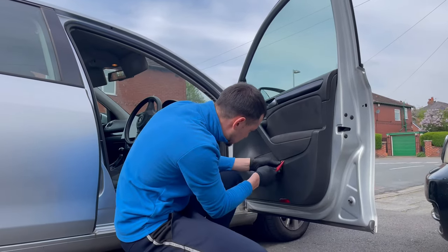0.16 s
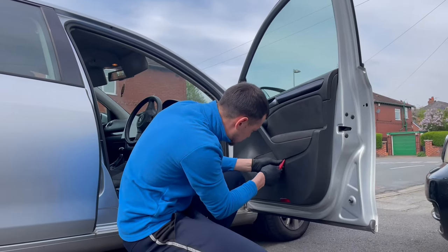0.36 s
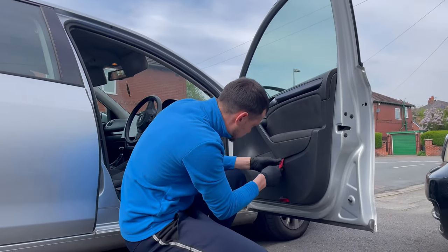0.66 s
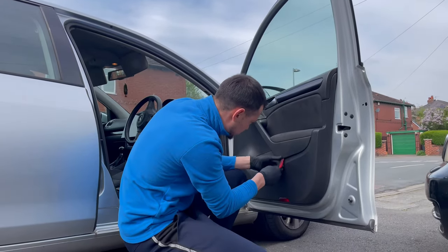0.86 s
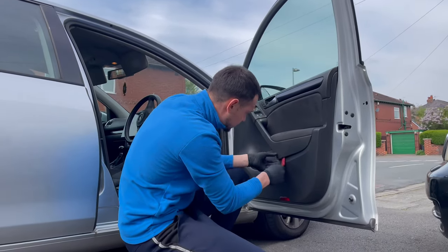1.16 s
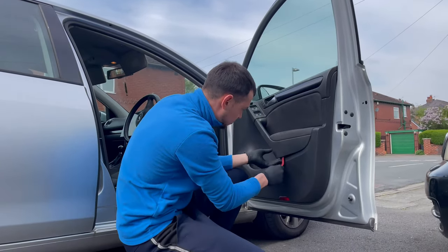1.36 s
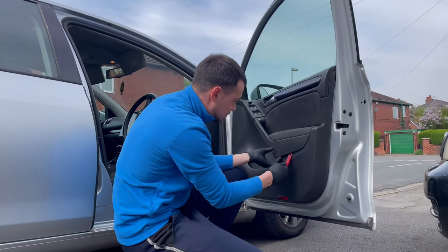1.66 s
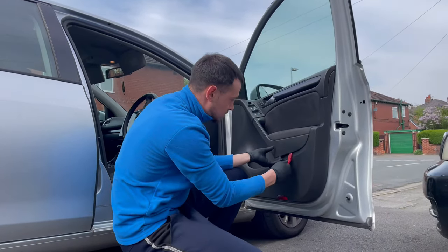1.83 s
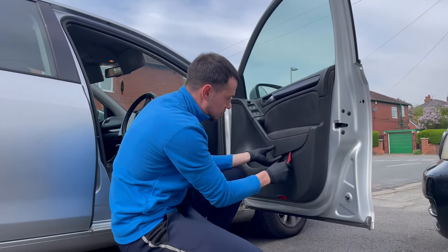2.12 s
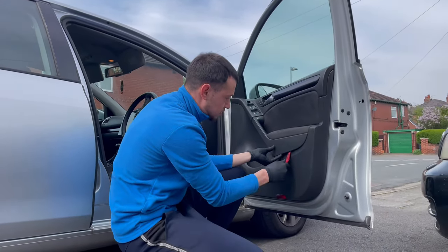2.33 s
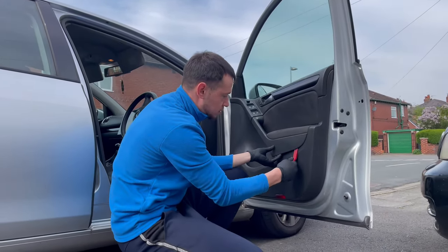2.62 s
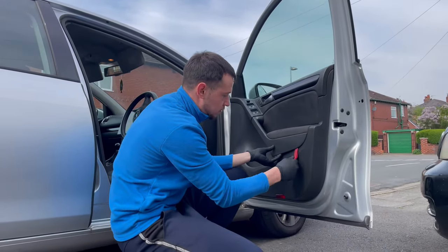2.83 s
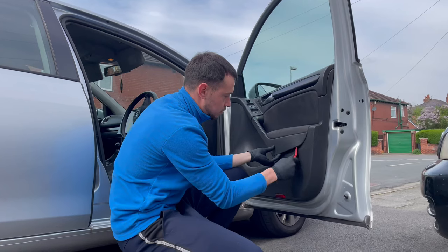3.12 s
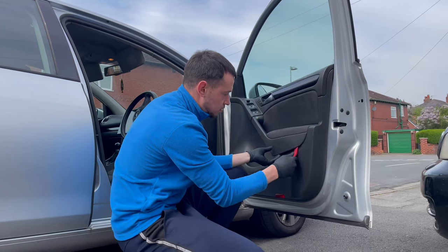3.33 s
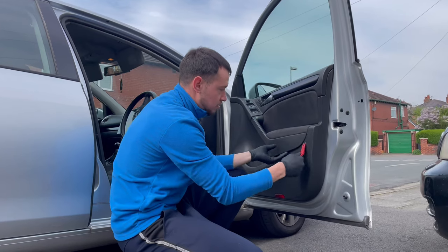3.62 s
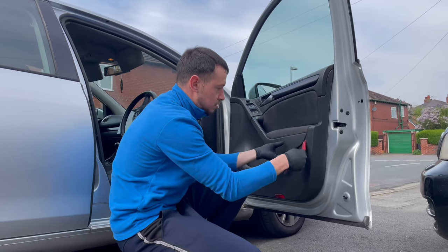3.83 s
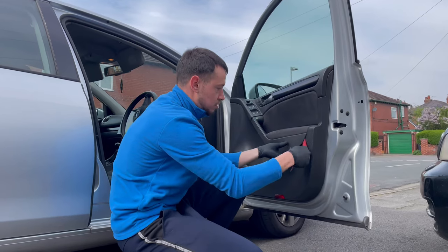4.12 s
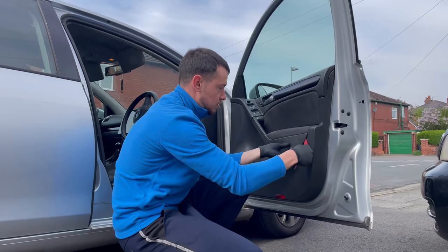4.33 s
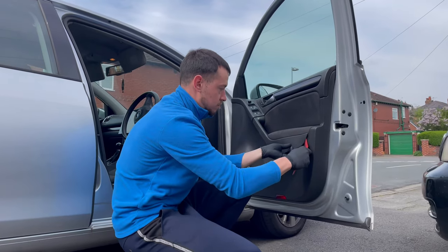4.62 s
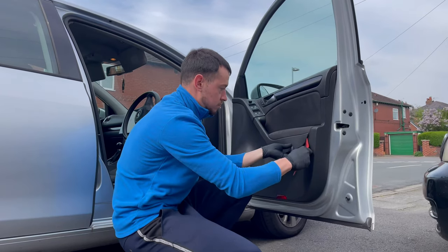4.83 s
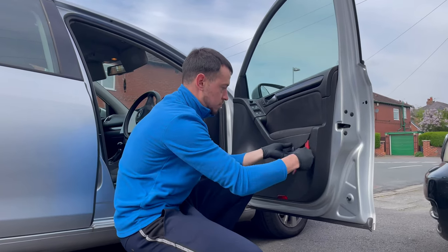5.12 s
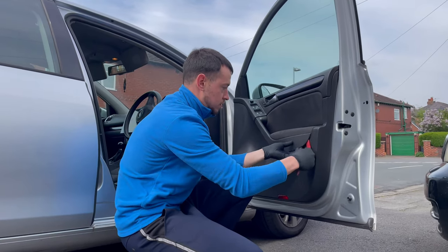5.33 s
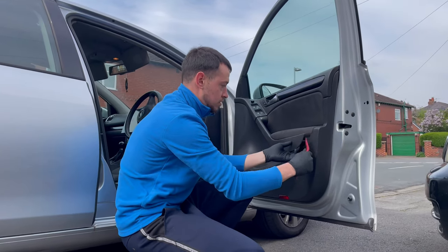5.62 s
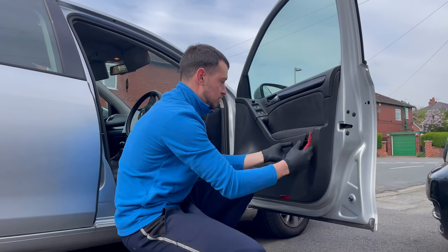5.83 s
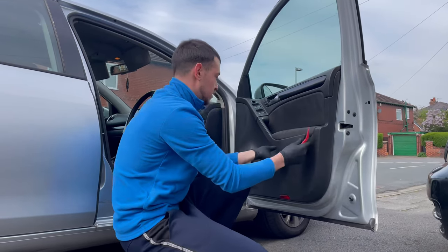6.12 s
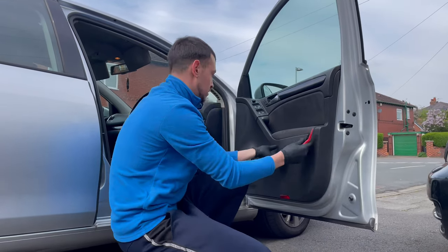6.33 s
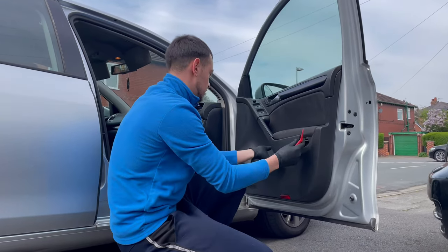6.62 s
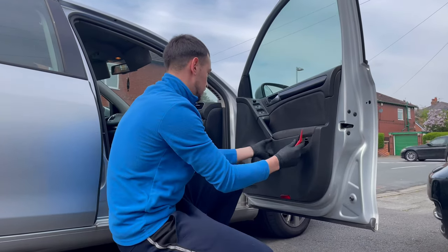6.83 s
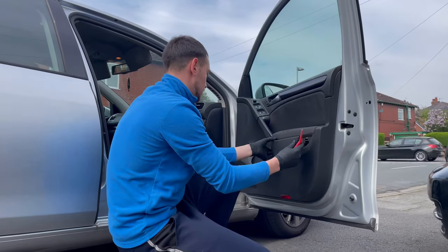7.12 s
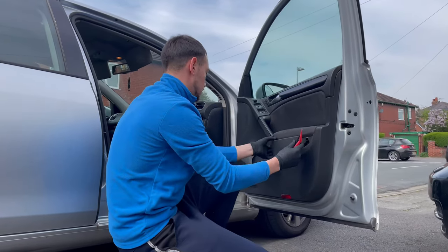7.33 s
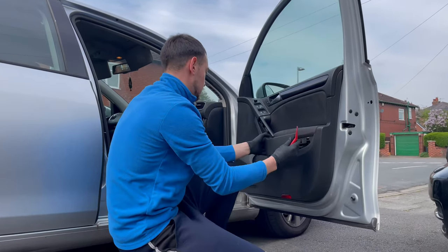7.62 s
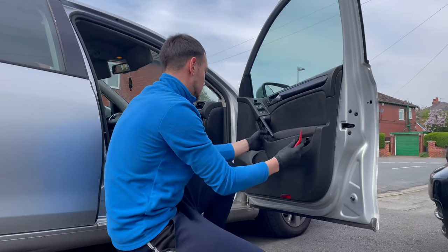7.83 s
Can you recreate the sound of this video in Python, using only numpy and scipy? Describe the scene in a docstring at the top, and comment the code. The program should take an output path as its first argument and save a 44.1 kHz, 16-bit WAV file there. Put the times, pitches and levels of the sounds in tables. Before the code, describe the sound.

Outdoors, over a soft hiss of faraway traffic, plastic trim on a car door clicks and cracks as a tool levers at it a couple of metres away. A few separate snaps with a hollow knock come first, wind puffs on the microphone around the middle, and then the snaps come more often, ending with a loud one. Gloves and sleeves rustle faintly, and the tool scrapes lightly.

```python
"""An open car door in a breezy street, two metres from a phone; traffic hisses far off throughout.
Wind puffs on the microphone ports as a plastic lever starts to pry and scrape at the trim, gloves and
sleeves rustling. Clips snap and ring the hollow panel, hard at 1.2 and 3.1 s. A gust peaks near 3.8 s;
from 5 s the snaps crowd in, the last big one at 7.5 s. A low cut slides up and down under it all."""
import sys
import numpy as np
from scipy import signal
from scipy.fft import rfft, irfft
from scipy.io import wavfile
from scipy.ndimage import uniform_filter1d

SR = 44100
rng = np.random.default_rng(int(sys.argv[2]) if len(sys.argv) > 2 else 0)


def materialize(psi):
    """Save the field psi as 16-bit PCM at rate SR to the path in sys.argv[1].

    A 1-D psi becomes a single channel; in a 2-D psi each row is a channel.
    """
    bounded = np.clip(np.atleast_2d(psi).T, -1, 1)
    quanta = np.round(bounded * 32767).astype(np.int16)
    wavfile.write(sys.argv[1], SR, quanta)


N = 351036
HZ = np.fft.rfftfreq(N, 1 / SR)

# Trim and lever snapping, two metres off. Each row: start in seconds; dry peaks of knock, thump, clack,
# crack and tick in dB; knock and thump pitch in Hz; slip time in ms; crack tilt in dB/octave; bite in dB.
CLIP_SNAPS = [(.225, -40, -42, -60, -54, -51, 900, 350, 4.6, 4, -3),
              (.319, -32, -62, -34, -31.5, -32, 1170, 519, 2.7, 4, 6),
              (.33, -23.5, -67, -32.5, -29.5, -33, 870, 474, 1.7, 2, -11),
              (.361, -24, -49, -29.5, -32, -35, 900, 371, 2.24, 14, 4),
              (.718, -53, -84, -47, -48.5, -78, 1110, 500, 4.3, -20, -4),
              (.998, -47, -40, -49, -44, -69, 723, 463, 5.8, -14, -10),
              (1.1785, -14.5, -19.5, -16, -5.5, -2, 1110, 445, 2.16, 8, 5),
              (1.259, -47, -41.5, -44, -38, -72, 1080, 474, 4.8, -21, -11),
              (1.46, -43, -64, -43, -48, -58, 830, 501, 3.5, -5, 3),
              (1.499, -38, -76, -42.5, -42, -74, 665, 470, 4.6, -27, 0),
              (1.866, -19.5, -32, -34.5, -29, -33, 646, 476, 2.6, -1.5, -5.5),
              (2.075, -47, -53.5, -46, -49, -80, 1154, 380, 4.7, -19, -9),
              (2.667, -41.5, -34, -46.5, -52, -76, 608, 330, 4, 4.5, 0),
              (2.868, -57.5, -55.5, -62.5, -72, -64, 923, 350, 9.5, 0, 0),
              (3.069, -11.5, -12.5, -10.5, -6, -9, 633, 287, 2.3, -4.5, 6),
              (3.305, -44, -49, -42.5, -44.5, -85, 894, 215, 5.1, -40, -9),
              (3.332, -42, -42.5, -46.5, -44.5, -48, 728, 202, 2.8, 1, -6),
              (4.515, -54, -75, -59, -45.5, -80, 913, 466, 4.1, -14, -8),
              (4.704, -39, -35.5, -42, -52, -59, 642, 347, 3.9, -4.5, -5),
              (4.975, -36, -38.5, -33.5, -43.5, -52, 800, 339, 3.4, 7, -2),
              (4.982, -10, -12, -16.5, -14.5, -14.5, 784, 380, 1.84, -2, -2),
              (5.419, -31.5, -51, -35, -47, -60, 1050, 476, 1.6, 8, 0),
              (5.423, -29.5, -36.5, -38, -21.5, -28, 1100, 480, 2.63, -6, -3.5),
              (5.4725, -14.5, -29, -10, -10, -17.5, 960, 342, 2.138, 11, 14.5),
              (5.711, -21, -51, -22.5, -18.5, -30, 930, 476, 2.7, -8.5, -3.5),
              (6.184, -34.5, -68, -42, -36.5, -39.5, 600, 255, 2.6, 8, -7),
              (6.219, -38, -68, -43, -40, -48, 738, 258, 2.9, 12, -4),
              (6.246, -42, -50, -42, -39, -45, 610, 210, 3.3, 8, -10),
              (6.285, -46, -62, -43, -41, -52, 958, 269, 2.6, 2, 0),
              (6.307, -35, -55, -30.5, -24.5, -19, 1100, 275, 1.7, 11, -13.5),
              (6.411, -31, -31.5, -33, -38, -46, 780, 480, 1.93, 7, 2),
              (6.423, -14, -22, -21, -13, -16.5, 700, 350, 2.18, -7, -4.5),
              (6.453, -21.5, -25.5, -34, -40, -38, 840, 358, 1.08, 4, -2),
              (6.478, -18.5, -22.5, -27, -22.5, -26, 645, 307, 2.05, 1, -13),
              (6.845, -23.5, -40.5, -20.5, -23, -25, 900, 345, 2.6, -7, -23),
              (7.004, -45, -70.5, -54.5, -50.5, -51, 1068, 398, 3, 12, 1),
              (7.105, -58.5, -70, -59, -52, -53.5, 1000, 400, 4.1, 2, -5),
              (7.352, -28.5, -37.5, -34.5, -35, -41, 715, 493, 2.9, -7, -15),
              (7.39, -25.5, -38.5, -25, -27, -36.5, 800, 480, 2, -5, -12),
              (7.461, -34, -34, -43, -39, -57, 616, 202, 9, 7, -3),
              (7.4965, -21.5, -25, -25, -16, -17, 1090, 299.8, 1.5, 4, -31),
              (7.499, -8.5, -14.5, -9.5, -9, -11.5, 1010, 290, 1.43, 9, 0),
              (7.557, -26.5, -28, -36.5, -36.5, -60, 940, 283, 2.9, -14, -2),
              (7.815, -48, -36.5, -51.5, -49, -54, 638, 296, 4.1, 7, -20)]
# The tick on top of a snap. Each row: frequency in Hz, level in dB.
TICK_SPECTRUM = [(4410, -29), (7800, -19), (8670, -9), (9610, -10), (13900, -17.5), (15500, -27),
                 (16500, -47.5)]
# Size of the main slip against the tiny ones, as a ratio for knock, thump, clack, crack and tick.
MAIN_SLIPS = [24, 9, 24, 22, 8]

def trim_snaps():
    """A clip lets go in one main slip amid a burst of tiny ones, which ring the panel."""
    time_ms = np.arange(2400) * 1000 / SR
    hz = np.linspace(0, SR / 2, 65)
    tick_gain = gain_of(spectrum_at(TICK_SPECTRUM, hz)) * (hz > 7000) * (hz < 20000)
    tick = signal.firwin2(65, hz, tick_gain, fs=SR)[None]
    rises, decays = [.9, .91, .824, .76, .39], [.95, 2.6, 1.244, 1.4, .98]  # per part, in slip times
    rebound_s, rebounds_db = .0093, [-14, -15.5, -13, -7.5, -21.5]  # the trim rebounds once, a little weaker
    draws = rng.standard_normal((len(CLIP_SNAPS), 2, 2, len(time_ms)))
    spots = rng.standard_normal((len(CLIP_SNAPS), 2, len(PANEL_MODES), 2, 1))
    groups = np.zeros((3, 2, N))  # snaps take turns among three sets of reflections
    for k, (start, *peaks_db, knock_hz, thump_hz, slip_ms, tilt_db, bite_db) in enumerate(CLIP_SNAPS):
        fine, clumps = draws[k]
        slips = fine * gain_of(4.5 * unit_rms(uniform_filter1d(clumps, size=24)))
        knock = panel_ring(spots[k], band=1, pitch_hz=knock_hz, falloff_db=6)
        thump = panel_ring(spots[k], band=0, pitch_hz=thump_hz, falloff_db=3.5)
        clack = panel_ring(spots[k], band=2, pitch_hz=1900, falloff_db=5)
        crack = panel_ring(spots[k], band=3, pitch_hz=2500, falloff_db=-7.5,
                           tilt_db=tilt_db, bite_db=bite_db)
        parts = zip([knock, thump, clack, crack, tick], peaks_db, rises, decays, MAIN_SLIPS, rebounds_db)
        for ring, db, rise, decay, main_size, rebound_db in parts:
            force = (1 - np.exp(-time_ms / (slip_ms * rise))) ** 2 * np.exp(-time_ms / (slip_ms * decay))
            main_slip = main_size * (force == force.max())
            sound = signal.fftconvolve((slips + main_slip) * force, ring, axes=1)
            sound *= gain_of(db) / abs(sound).max(axis=1, keepdims=True)
            add(groups[k % 3], start - .0012, sound)
            add(groups[k % 3], start + rebound_s, gain_of(rebound_db) * sound[::-1])  # sides swapped
    return sum(group + gain_of(-8) * cabin_reflections(group) for group in groups)

# The hollow door panel's modes. Each row: frequency in Hz, level in dB, seconds to die by 60 dB.
PANEL_MODES = [(205, -5, .05), (258, 0, .07), (292, 0, .07), (345, 1, .065), (476, -4, .045),
               (600, -3, .02), (760, -3, .018), (945, -2, .02), (1190, -3, .016), (1450, -1, .011),
               (1720, -2, .013), (1900, 0, .013), (2410, 2, .006), (2750, -2, .004), (3300, -1, .0035),
               (3700, 0, .005), (4200, -2, .004), (4900, -8, .003), (5600, -12, .0025), (6500, -11, .003)]
# Edges in Hz of the thump, knock, clack and crack bands.
BAND_EDGES = [0, 550, 1320, 2580, 7500]

def panel_ring(spot, band, pitch_hz, falloff_db, tilt_db=0, bite_db=0):
    """One band of modes, losing falloff_db per octave from the pitch; the struck spot varies each one."""
    shift, strength = spot
    t = np.arange(1200 if band else 4000) / SR
    out = 0
    for k, (hz, db, t60) in enumerate(PANEL_MODES):
        if BAND_EDGES[band] < hz < BAND_EDGES[band + 1]:
            octaves = np.log2(hz / pitch_hz)
            phase = 2 * np.pi * hz * (1 + shift[k] / 60) * t
            twin_mode = gain_of(-4.5) * np.sign(strength[k, 1]) * np.sin(phase * 1.049)
            db += 3 * strength[k, 0] - falloff_db * abs(octaves) + tilt_db * octaves
            db += bite_db * np.exp(-(np.log2(hz / 3800) / .25) ** 2)
            out = out + (-1) ** k * gain_of(db - 60 * t / t60) * (np.sin(phase) + twin_mode)
    return out

# The open cabin and the street around it. Each row: frequency in Hz, seconds to die by 60 dB.
CABIN_DECAY = [(250, 0.19), (1000, 0.098), (4000, 0.1), (7000, 0.11), (12000, 0.059)]

def cabin_reflections(sound):
    """Dense reflections reach the phone from 4 ms on, each band dying at its own speed."""
    hz, t, bands = signal.stft(rng.standard_normal((2, SR // 4)), SR, nperseg=256)
    decay = gain_of(-60 * t / spectrum_at(CABIN_DECAY, hz)[:, None])
    tail = signal.istft(bands * decay, SR, nperseg=256)[1]
    tail *= np.arange(tail.shape[1]) > .004 * SR
    return signal.oaconvolve(sound, tail / np.linalg.norm(tail[0]), axes=1)[:, :N]

# The lever on the door trim. Each row: start and end in seconds, level in dB, resonance in Hz.
LEVER_DRAGS = [(0.375, 0.482, -66, 4400), (1.451, 1.533, -59, 3450), (2.334, 2.369, -61.5, 2900),
               (2.37, 2.408, -50, 3570), (5.41, 5.436, -47.5, 3950), (6.521, 6.832, -71, 4670),
               (6.899, 7.351, -71.5, 4600)]

def lever_scrapes():
    """The lever tip drags over grained plastic: rough hiss around one broad resonance."""
    out = np.zeros((2, N))
    for start, end, db, hz in LEVER_DRAGS:
        fine, lumps = rng.standard_normal((2, 2, round((end - start) * SR)))
        friction = fine * gain_of(2.3 * unit_rms(uniform_filter1d(lumps, size=90)))
        drag = signal.lfilter(*signal.iirpeak(hz, Q=2.5, fs=SR), friction)
        arch = np.sin(np.linspace(0, np.pi, drag.shape[1])) ** .41
        add(out, start, gain_of(db) * unit_rms(drag) * arch)
    return out

# Swells of high hiss at the door: sleeve rustle and the hissy tails of snaps.
# Each row: loudest moment in seconds, level in dB, length in seconds.
HISS_SWELLS = [(0.576, -74.5, 0.16), (1.053, -69.5, 0.11), (1.228, -57, 0.15), (1.599, -64, 0.24),
               (1.852, -67, 0.11), (2.405, -59, 0.063), (2.492, -66, 0.078), (2.667, -71, 0.054),
               (3.114, -59.5, 0.14), (3.373, -67.5, 0.11), (3.588, -64.5, 0.43), (3.787, -73.5, 0.25),
               (4.056, -67.5, 0.065), (4.729, -67, 0.042), (5.327, -78.5, 0.23), (5.57, -62, 0.27),
               (5.746, -63.5, 0.096), (5.988, -60, 0.28), (6.237, -59, 0.13), (6.335, -59, 0.1),
               (6.466, -64.5, 0.24), (6.622, -68, 0.25), (6.76, -71.5, 0.39), (6.908, -68, 0.1),
               (6.988, -71.5, 0.065), (7.088, -71, 0.084), (7.54, -64, 0.21)]
# The colour of that hiss. Each row: frequency in Hz, level in dB.
HISS_SPECTRUM = [(1000, -35.5), (2000, -7.5), (3630, -1), (5540, -4.5), (6700, -8), (8660, -23),
                 (10000, -13), (11500, -19), (12800, -13), (14300, -14), (15600, -24), (16300, -46.5)]
# Its treble above 8600 Hz. Each row: time in seconds, gain in dB.
HISS_TREBLE = [(0, -5), (1.0, 8.5), (1.7, -2.5), (2.4, 0), (3.35, -2.5), (3.58, 12.5), (3.9, 4.5),
               (4.1, 7.5), (5.3, 0.5), (6.0, 1.5), (6.6, 3.5), (7.96, 10.5)]

def rustle_and_snap_tails():
    """Gritty hiss swells as rubber and cloth slide, and in the wake of snaps; its treble swells apart."""
    grit = gain_of(2 * drift(ms=1.8)[0] + 1.8 * drift(ms=25)[0] + .99 * drift(ms=.74)[0])
    hiss = unit_rms(noise(HISS_SPECTRUM) * grit)
    treble = signal.sosfilt(signal.butter(4, 8600, "high", fs=SR, output="sos"), hiss)
    body = signal.sosfilt(signal.butter(4, 8600, fs=SR, output="sos"), hiss)
    t, rise_share = np.arange(N) / SR, .48
    swells = np.full(N, gain_of(-85.5))  # a faint hiss stays between swells
    for peak_s, db, length in HISS_SWELLS:
        from_peak = np.maximum((peak_s - t) / rise_share, (t - peak_s) / (1 - rise_share)) / length
        swells += gain_of(db - 14.5 * np.minimum(from_peak, 3) ** 2)
    return (body + treble * gain_of(curve(HISS_TREBLE))) * swells

# The breeze right on the microphone. Each row: time in seconds, level in dB.
WIND_LEVEL = [(0, -62), (.15, -55), (.28, -35), (.38, -77.5), (.78, -68.5), (.9, -53), (2.17, -50.5),
              (2.5, -50.5), (2.7, -56.5), (2.9, -48), (3.74, -47.5), (3.83, -32), (4.08, -52.5),
              (4.4, -53.5), (4.9, -50.5), (5.42, -49.5), (6.0, -37.5), (6.2, -47), (6.92, -51.5),
              (7.5, -41.5), (7.96, -40.5)]
# The colour of its roar. Each row: frequency in Hz, level in dB.
WIND_SPECTRUM = [(25, -30), (60, 3), (150, 2), (330, 3), (600, -8), (1000, -18.5), (2000, -64)]
# Its strongest eddies. Each row: middle in seconds, level in dB, pitch in Hz, width in ms (5 at least).
STRONG_EDDIES = [(0.207, -29, 173, 19), (0.237, -23, 391, 21.5), (0.25, -23.5, 147, 15.6),
                 (0.273, -33, 194, 11), (0.905, -30, 380, 5.3), (1.122, -35, 421, 13),
                 (1.738, -30, 342, 3.3), (2.677, -37.5, 396, 15), (2.94, -35, 164, 18),
                 (3.137, -22, 236, 3.7), (3.582, -28.5, 181, 6.4), (3.625, -22, 139, 20),
                 (3.647, -24.5, 149, 3.9), (3.692, -30, 194, 32), (3.72, -27.5, 153.6, 44),
                 (3.781, -22.5, 167, 10), (3.811, -22.5, 320, 12.4), (3.839, -18, 317, 4.2),
                 (3.856, -40, 337, 11), (3.882, -24, 300, 3.3), (3.907, -21, 420, 6.3),
                 (3.927, -25, 380, 7.5), (4.023, -27.5, 346.4, 8.6), (4.045, -33, 450, 12),
                 (4.21, -34.5, 397, 3.9), (4.228, -31, 399, 20), (4.251, -28, 445, 5.4),
                 (5.051, -29.5, 321, 10), (5.095, -27.5, 333, 4.1), (5.197, -22.5, 532, 4.1),
                 (5.2, -28.5, 145.4, 14.3), (5.228, -30, 378, 1.6), (5.276, -27, 329, 4.2),
                 (5.705, -32, 329, 24), (5.775, -29, 320, 12), (5.811, -33.5, 452, 21),
                 (5.89, -37.5, 283, 52), (5.978, -21, 626, 4), (5.982, -27, 410, 23), (5.997, -27, 350, 25),
                 (6.026, -21, 480, 4.5), (6.112, -25, 61.5, 180), (6.19, -41, 52, 57),
                 (6.191, -32.5, 288, 3.4), (6.363, -35, 277, 14), (7.422, -31.5, 255, 7.2),
                 (7.468, -29, 296, 9.5), (7.767, -29, 304, 6.7), (7.862, -31, 275, 7.3),
                 (7.888, -19, 380, 10.2), (7.95, -26, 338, 31)]

def wind():
    """A lumpy low roar on the ports; each eddy is a few wavering cycles with a sharper flap inside."""
    lumps = gain_of(2.6 * drift(ms=26)[0])
    out = unit_rms(noise(WIND_SPECTRUM) * lumps) * gain_of(curve(WIND_LEVEL))
    eddies = STRONG_EDDIES + chance_eddies(count=45)
    for middle, db, hz, ms in eddies:
        offset, glide, flap, waver = rng.random((4, 2, 1))
        ms = max(ms, 5)
        widths = np.arange(-2 * ms, 2 * ms, 1000 / SR) / ms  # time from the middle
        cycles = hz * ms / 1000 * (widths + .31 * (glide - .5) * widths ** 2) + offset
        cycles += .13 * np.sin(2 * np.pi * ((.25 + .2 * waver) * cycles + flap))
        body = np.exp(-2.4 * widths ** 2) * np.sin(2 * np.pi * cycles)
        flap_cycles = (1.3 + .57 * flap) * cycles + glide
        sharp_flap = np.exp(-12 * (widths + .17) ** 2) * np.sin(2 * np.pi * flap_cycles)
        add(out, middle - 2 * ms / 1000, gain_of(db) * (body + gain_of(-9) * sharp_flap))
    return out

def chance_eddies(count):
    """Eddies at chance moments, about 10 dB above the breeze then blowing: rows like STRONG_EDDIES."""
    when, size, pitch, width = rng.random((count, 4)).T
    middle = .1 + when * (N / SR - .2)
    db = np.interp(middle, *np.transpose(WIND_LEVEL)) + 9.5 + size
    hz, ms = np.interp(pitch, (0, 1), (256.4, 446.6)), np.interp(width, (0, 1), (3.6, 24.6))
    return list(zip(middle, db, hz, ms))

# Traffic, far from the car. Each row: time in seconds, level in dB.
TRAFFIC_LEVEL = [(0.0, -52), (1.35, -46), (2.95, -51), (6.92, -47), (7.96, -49.5)]
# Its colour at that distance. Each row: frequency in Hz, level in dB.
TRAFFIC_SPECTRUM = [(90, -72.5), (150, -32.5), (300, -21.5), (520, 1), (650, 2), (1140, 2.5), (1350, -7),
                    (1900, -9), (2800, -21), (3420, -27.5), (4700, -30.5), (5500, -41), (8300, -49),
                    (13600, -68), (16500, -76)]

def traffic():
    """Far tyre hiss that swells a little."""
    return noise(TRAFFIC_SPECTRUM) * gain_of(curve(TRAFFIC_LEVEL) + 2.3 * drift(ms=65)[0])

# How the door, the far street and the wind reach the phone's two ports. Each row: frequency in Hz,
# left lead in radians, likeness from 0 to 1, left over right in dB.
FROM_DOOR = [(100, 0, .9, -1), (350, .5, .92, .5), (900, .7, .88, 4), (1700, .3, .5, -1),
             (2800, .8, .55, -1), (4800, .8, .7, -2), (5900, 3.9, .5, -1), (6900, 4.8, .6, 0),
             (7900, 3.3, .88, 1), (9000, 3, .98, -1), (11000, 1.6, .97, 0), (13800, 0, .99, 0),
             (16500, -.5, .99, 0)]
FROM_STREET = [(100, -4.5, .5, 18.5), (340, -2.5, 0.16, -3.5), (700, 3.5, 0.27, 2), (2900, 1, 0.63, -2.5),
               (4600, 12, 0.51, 0), (6710, 7.5, 0.57, -3), (7500, -13.5, .5, -4), (9300, 17.5, 0.83, -1.5),
               (12400, 22, 0.85, -2), (16500, 3, .8, 4.5)]
FROM_WIND = [(30.7, 0.13, 1, -2), (334, 1, 0.83, 1), (800, 1, 0.86, 3)]

def microphone_ports(pair, arrival):
    """The right port hears a phase-shifted share of what the left hears, plus a part of its own."""
    lead, likeness, pan_db = spectrum_at(arrival, HZ)
    left, own = rfft(pair)
    right = likeness * left + np.sqrt(1 - likeness ** 2) * own
    steer = np.exp(.5j * lead) * gain_of(pan_db / 2)
    return irfft([left * steer, right / steer], N)

def gain_of(db):
    return 10 ** (np.asarray(db) / 20)

def unit_rms(x):
    return x / np.sqrt(np.mean(x ** 2) + 1e-20)

def spectrum_at(rows, hz):
    """Every column of a spectrum at the given frequencies."""
    row_hz, *columns = np.transpose(rows)
    return np.squeeze([np.interp(np.log(hz + 1), np.log(row_hz + 1), column) for column in columns])

def curve(rows):
    return np.interp(np.arange(N) / SR, *np.transpose(rows))

def add(mix, start_s, sound):
    part = mix[:, round(start_s * SR):][:, :sound.shape[1]]
    part += sound[:, :part.shape[1]]

def drift(ms):
    """Two rows of smooth chance that change within about ms."""
    size = max(int(ms * SR / 1000), 2)
    return unit_rms(uniform_filter1d(uniform_filter1d(rng.standard_normal((2, N)), size), size))

def noise(spectrum):
    """Two unrelated rows of coloured noise."""
    return unit_rms(irfft(rfft(rng.standard_normal((2, N))) * gain_of(spectrum_at(spectrum, HZ)), N))

def scene():
    """The door at two metres, the street far off and the wind on the phone itself."""
    door = microphone_ports(trim_snaps() + lever_scrapes() + rustle_and_snap_tails(), FROM_DOOR)
    return door + microphone_ports(traffic(), FROM_STREET) + microphone_ports(wind(), FROM_WIND)

# The sliding low cut. Each row: time in seconds, edge in octaves above 25 Hz (held within 0.6 to 3.3).
LOW_CUT_EDGE = [(0.1, 3.2), (0.17, 1.6), (0.29, 1.8), (0.36, 2.95), (1.0, 3.3), (1.15, 3.2), (1.185, 2.55),
                (1.22, 2.66), (1.65, 2.84), (1.69, 1.9), (1.79, 3.2), (1.9, 3.3), (1.98, 1.74), (2.53, 2.9),
                (2.66, 1.84), (2.76, 2.1), (2.97, 1.5), (3.02, 3.6), (3.1, 0.54), (3.4, 1.65), (3.53, .7),
                (3.8, 0.86), (3.9, 3.06), (4.95, 3.25), (4.99, 3.56), (5.03, 2), (5.12, 5.7), (5.18, 1.97),
                (5.32, 3.85), (5.47, 2.65), (5.55, 1.9), (6.04, 2.72), (6.09, 2.6), (6.23, 2.36),
                (6.3, 2.43), (7.2, 2.17)]

def record(dry):
    """A low cut of 29 dB per octave slides up and down; the treble ends at 16.7 kHz."""
    hz, t, bands = signal.stft(dry, SR, nperseg=2048, noverlap=1536)
    edge = np.clip(np.interp(t, *np.transpose(LOW_CUT_EDGE)), .6, 3.3)
    octaves_below = edge - np.log2(hz[:, None] / 25 + .0011)
    cut_db = np.clip(29 * (octaves_below + .28), 0, 65)
    thinned = signal.istft(bands * gain_of(-cut_db), SR, nperseg=2048, noverlap=1536)[1][:, :N]
    band_limit = signal.firwin(511, 16700, window=("kaiser", 9), fs=SR)
    return signal.oaconvolve(thinned, band_limit[None], "same")

dry = scene()
out = record(dry)
materialize(out)
```